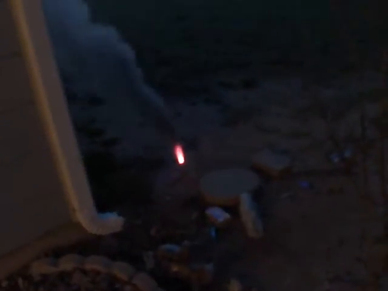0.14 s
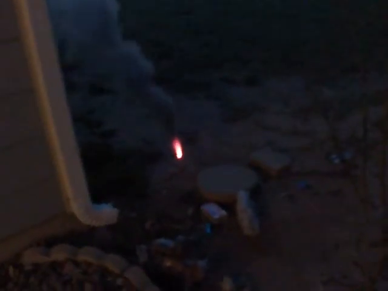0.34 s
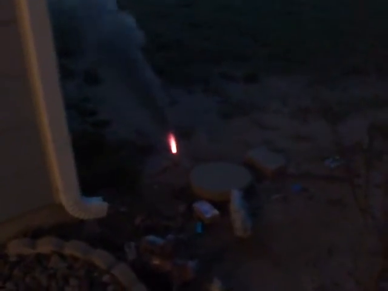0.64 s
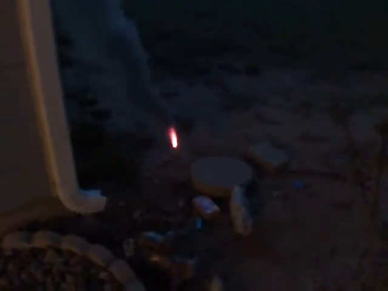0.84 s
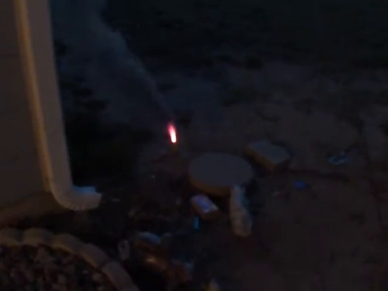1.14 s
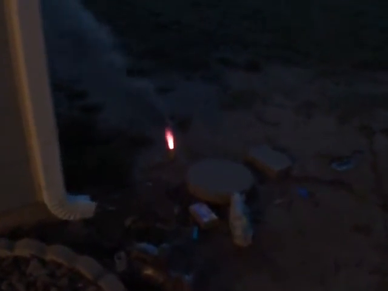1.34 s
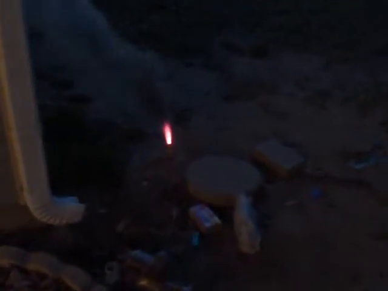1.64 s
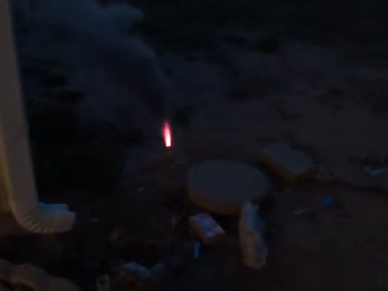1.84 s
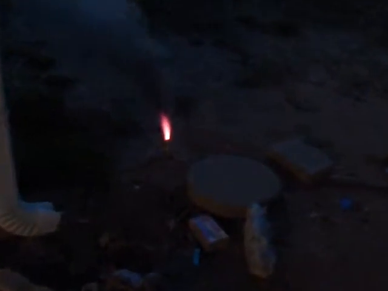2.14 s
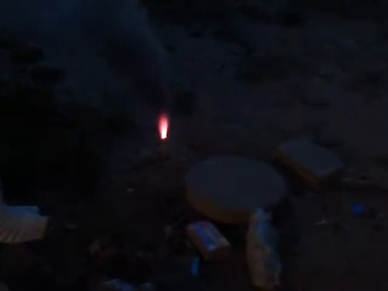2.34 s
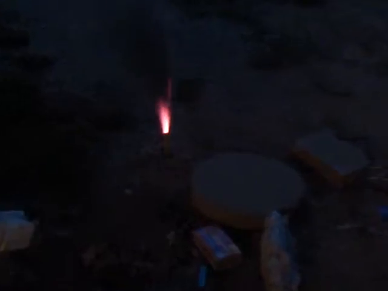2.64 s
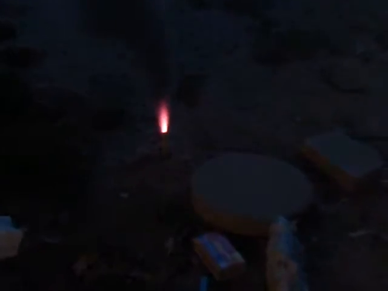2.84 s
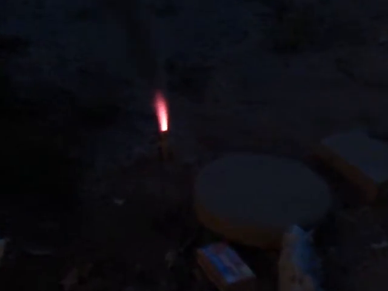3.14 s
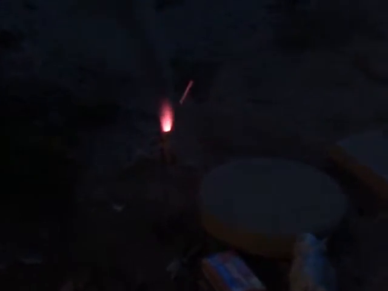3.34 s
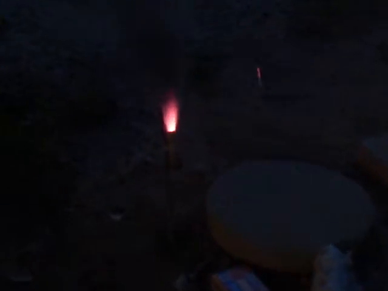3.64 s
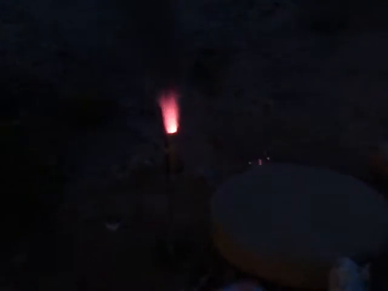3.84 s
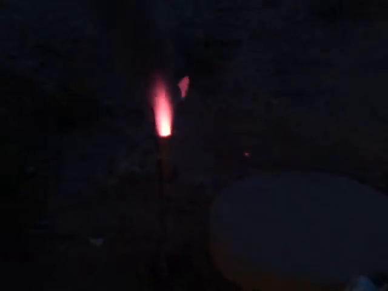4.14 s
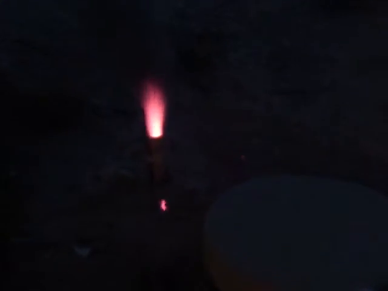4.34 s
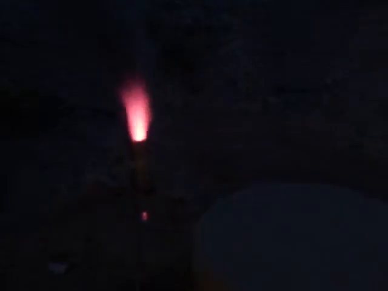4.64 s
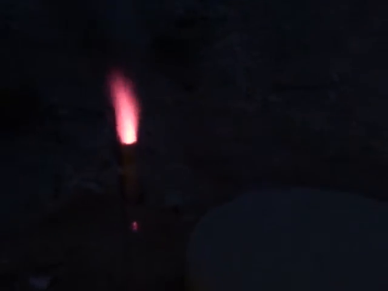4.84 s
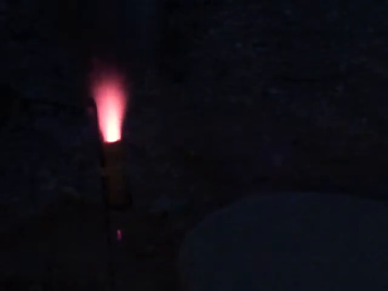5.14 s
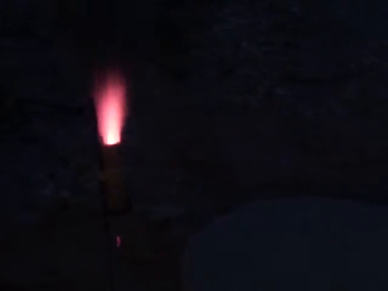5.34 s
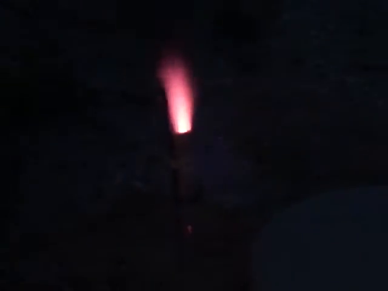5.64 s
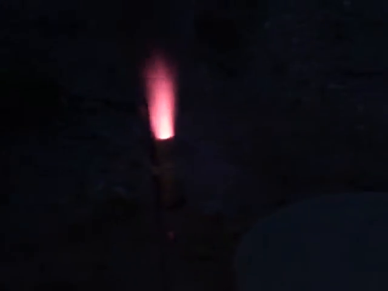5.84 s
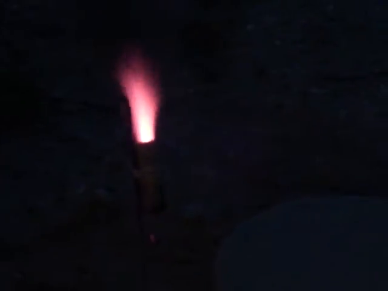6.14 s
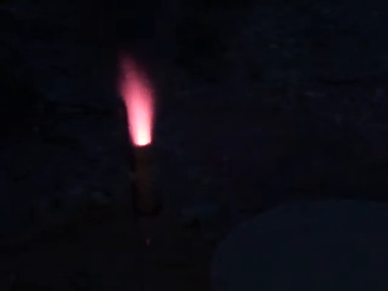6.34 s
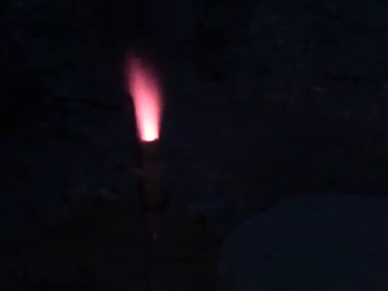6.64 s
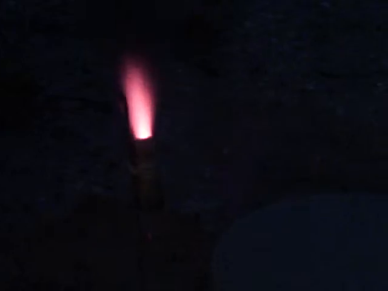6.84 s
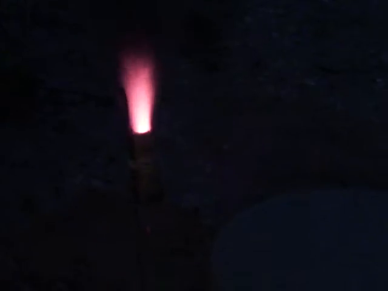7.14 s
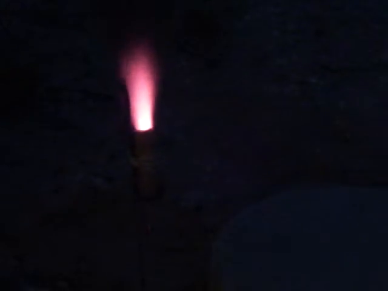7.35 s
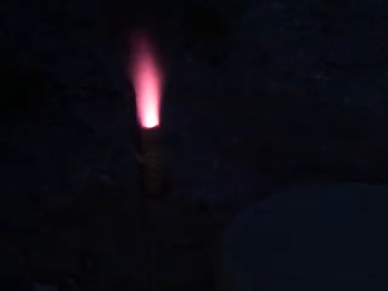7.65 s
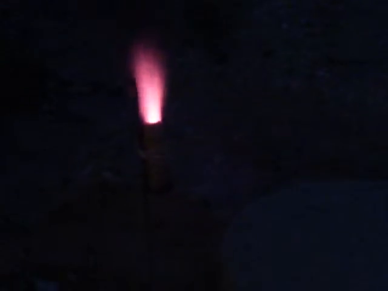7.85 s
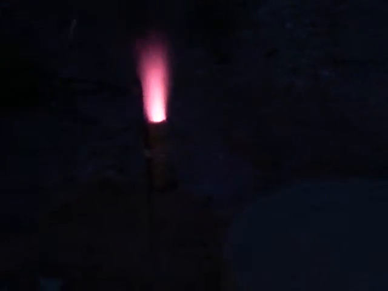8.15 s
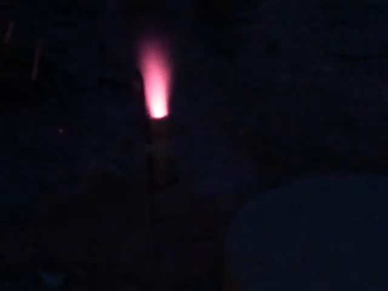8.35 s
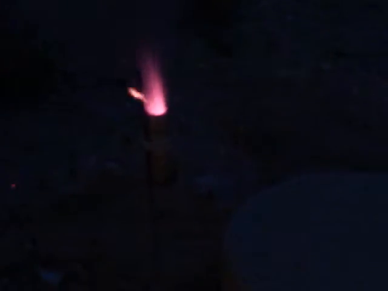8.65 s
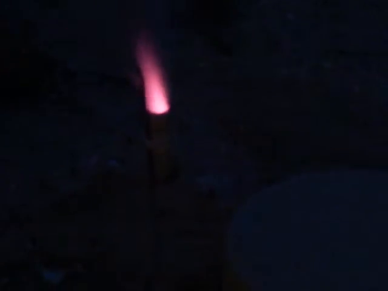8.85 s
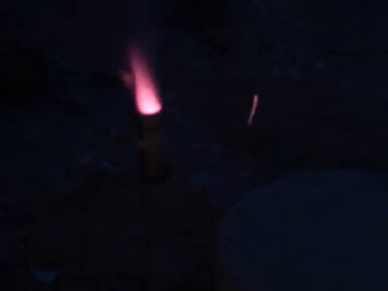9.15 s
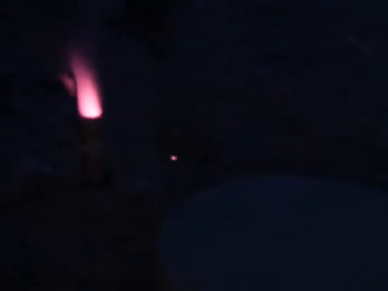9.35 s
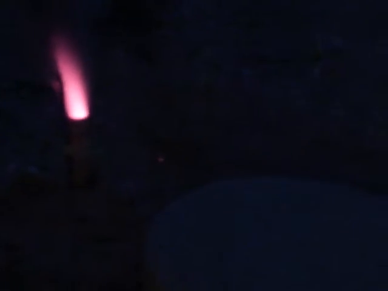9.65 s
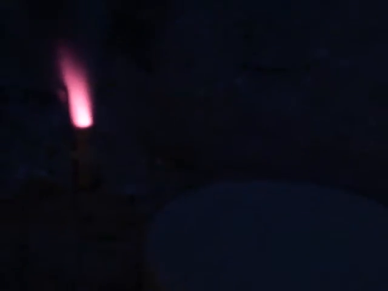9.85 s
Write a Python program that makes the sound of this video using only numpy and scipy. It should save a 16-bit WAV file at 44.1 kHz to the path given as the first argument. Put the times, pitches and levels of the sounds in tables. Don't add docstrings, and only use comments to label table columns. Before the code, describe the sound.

Continuous harsh jet of burning gas in a yard, its breathy whistle-like resonance gliding down over ten seconds with small surges and sags.

```python
import sys
import numpy as np
from scipy import signal
from scipy.fft import rfft, irfft, next_fast_len
from scipy.io import wavfile
from scipy.ndimage import uniform_filter1d, map_coordinates

SR = 44100
rng = np.random.default_rng(int(sys.argv[2]) if len(sys.argv) > 2 else 0)


def field_ratio(decibels):
    return 10 ** (np.asarray(decibels, dtype=float) / 20)


def waveform_to_disk(signal):
    frames = np.transpose(np.atleast_2d(signal))
    scaled = np.clip(frames, -1, 1) * 32767
    samples = np.round(scaled).astype(np.int16)
    wavfile.write(sys.argv[1], SR, samples)


N = 441000
TOP_HZ = 10960
FRAME = 512
STUB_FROM_MM = 29.2

# time [s], empty tube above the fuel [mm], flare of the flame outside the mouth [dB].
BURN = [(0, 14.3, -0.5), (1, 16.9, 0), (2, 17.45, 0), (4, 20.6, 0), (5.6, 22.7, -0.5), (6.4, 24.2, 0),
        (7.05, 24.9, 0.5), (8.15, 26.3, 0), (8.3, 26.6, 3), (8.95, 28.1, 7.5), (9.35, 29.7, 7.5),
        (9.6, 31.2, 6), (10, 32.5, 4.5)]


def along(points, hz):
    f, v = np.transpose(points)
    return np.interp(np.log(hz + 1), np.log(f + 1), v)


def curves(rows, t):
    s, *cols = np.transpose(rows)
    return [np.interp(t, s, c) for c in cols]


def wobble(rate):
    knots = rng.standard_normal(int(N * rate / SR) + 4)
    return map_coordinates(knots, [np.arange(N) * rate / SR])


def filtered(x, response):
    m = next_fast_len(N + SR // 2)
    spectrum = rfft(x, m) * response(np.fft.rfftfreq(m, 1 / SR))
    return irfft(spectrum, m)[..., :N]


def turbulence(colour, patchy_db):
    hz, t, z = signal.stft(rng.standard_normal(N), SR, nperseg=FRAME)
    field = uniform_filter1d(rng.standard_normal(z.shape), size=8, axis=0)
    field = uniform_filter1d(field, size=8, axis=1)
    gain = colour(hz[:, None], t) * np.ones(z.shape)
    gain = gain / np.sqrt(np.mean(gain ** 2, axis=0))
    gain = gain * field_ratio(patchy_db * field / field.std())
    x = signal.istft(z * gain, SR, nperseg=FRAME)[1][:N]
    return x / x.std()


def tube_colour(hz, t):
    sound_m_s = 343
    depth_mm, flare_db = curves(BURN, t)
    low_hz = sound_m_s * 1000 / (4 * depth_mm)
    stub_mm = np.maximum(depth_mm - STUB_FROM_MM, 0)
    share = 0.44 * (20 / depth_mm) / (1 + 0.06 * stub_mm)
    third_db = -17.5 - 0.75 * np.maximum(depth_mm - 20, 0) + 1.35 * flare_db + 3 * stub_mm

    def mode(centre_hz, width_hz):
        return hz * width_hz / np.sqrt((centre_hz ** 2 - hz * hz) ** 2 + (hz * width_hz) ** 2 + 1)

    first = mode(low_hz, share * low_hz) ** 1.37
    third = field_ratio(third_db) * mode(2.9 * low_hz, 2.2 * share * low_hz)
    return np.hypot(first, third) * (hz < 1.03 * TOP_HZ)


def tube(t, swing_db, chuff_db):
    flare_db = curves(BURN, t)[1]
    level_db = -25.5 + 0.088 * flare_db + swing_db + 0.5 * chuff_db + 0.088 * wobble(30)
    return field_ratio(level_db) * turbulence(tube_colour, patchy_db=0.42)


def hiss(t, swing_db, chuff_db):
    # frequency [Hz], density [dB per Hz].
    hiss_rows = [(800, -34), (1500, -18.5), (2200, -8), (3000, -0.5), (4500, -3), (6500, -0.5),
                 (8500, -1.5), (11000, 0)]
    early_db, fade_s = 2, 2.7
    depth_mm, flare_db = curves(BURN, t)
    level_db = -30.5 + early_db * np.exp(-t / fade_s) + 0.44 * flare_db + 0.83 * swing_db
    level_db -= 0.3 * np.maximum(depth_mm - STUB_FROM_MM, 0)
    level_db += 0.45 * chuff_db + 0.23 * wobble(30)
    colour = lambda hz, t: field_ratio(along(hiss_rows, hz)) * (hz < 1.03 * TOP_HZ)
    return field_ratio(level_db) * turbulence(colour, patchy_db=0.4)


def roar(t, swing_db, chuff_db):
    # frequency [Hz], density [dB per Hz].
    roar_rows = [(300, -42), (500, -7), (700, -3), (1000, -2), (1500, -3), (2500, 0), (5000, -18)]
    flare_db = curves(BURN, t)[1]
    level_db = -42 + flare_db + 0.42 * swing_db + 0.87 * wobble(7) + 0.14 * chuff_db
    return field_ratio(level_db) * turbulence(lambda hz, t: field_ratio(along(roar_rows, hz)), patchy_db=0.9)


def rumble(t):
    # frequency [Hz], density [dB per Hz].
    rumble_rows = [(20, -8), (200, 0), (400, 1), (700, -3), (1500, -35)]
    breeze_s, breeze_long_s, breeze_db = 5.8, 2.2, 2
    flare_db = curves(BURN, t)[1]
    level_db = -56 + 0.81 * flare_db + 1.3 * wobble(2.5)
    level_db += breeze_db * np.exp(-((t - breeze_s) / breeze_long_s) ** 4)
    return field_ratio(level_db) * turbulence(lambda hz, t: field_ratio(along(rumble_rows, hz)), patchy_db=0.6)


def pressure(t):
    # blow-out time [s], build-up [dB], sag [dB].
    chuffs = [(0.92, 0.7, 0.3), (1.5, -0.5, 2.5), (3.0, -0.5, .8), (3.62, 0.4, -1), (4.0, 0, 2),
              (4.8, 0.2, 1.8), (4.99, -0.7, 2.5), (5.31, 2, 3), (5.47, 1, -2), (6.3, 1, 2.5),
              (6.85, 0.5, 0.5), (7.1, 2, 0.3), (7.52, 1, 0), (7.75, 0.5, 0.5), (5.72, 0.5, -0.5),
              (6.55, 1, .3), (1.78, .8, -1), (7.98, .2, 2.3), (8.4, 1, 0), (9.07, 2.5, 1.5),
              (9.6, -0.5, 0.5)]
    build_s, blow_s, recover_s = 0.31, 0.033, 0.071
    s, build_db, sag_db = np.transpose(chuffs)[:, :, None]
    coarse_s = t[::FRAME // 4]
    since_s = coarse_s - s
    blown = 0.5 + 0.5 * np.tanh(since_s / blow_s)
    swing_db = build_db * (1 - blown) * np.exp(-abs(since_s) / build_s)
    swing_db -= sag_db * blown * np.exp(-abs(since_s) / recover_s)
    return np.interp(t, coarse_s, swing_db.sum(axis=0))


def spits(t):
    # time [s], length [s], start pitch [Hz], end pitch [Hz], level [dB].
    lumps = [
        (5.247, .014, 1200, 1850, -42),
    ]
    out = np.zeros(N)
    for s, length_s, from_hz, to_hz, db in lumps:
        since_s = t - s
        cycles = (from_hz + to_hz) / 2 * since_s + (to_hz - from_hz) / (4 * length_s) * since_s ** 2
        envelope = field_ratio(db + 7 * wobble(300)) * np.exp(-(since_s / length_s) ** 2)
        out += envelope * np.sin(2 * np.pi * cycles)
    return out


def motor():
    t = np.arange(N) / SR
    swing_db = pressure(t)
    chuff_db = 0.04 * wobble(14) + 0.15 * wobble(50)
    flame = hiss(t, swing_db, chuff_db) + roar(t, swing_db, chuff_db) + rumble(t)
    return tube(t, swing_db, chuff_db) + flame + spits(t)


def echoes(x, near, far, near_db, far_db):
    def copies(hz, table):
        return sum(g * np.exp(-2j * np.pi * hz * ms / 1000) for ms, g in table)

    def response(hz):
        dull = 1 / (1 + 1j * hz / 3000)
        return 1 + field_ratio(near_db) * copies(hz, near) + field_ratio(far_db) * dull * copies(hz, far)

    return filtered(x, response)


def yard(x, count):
    # frequency [Hz], t60 [s].
    decay = [(200, 0.12), (2000, 0.13), (10000, 0.025)]
    out, place = np.zeros(N), np.linspace(0, count - 1, N)
    for k in range(count):
        hz, t, z = signal.stft(rng.standard_normal(SR // 5), SR, nperseg=256)
        fade = field_ratio(-60 * t / along(decay, hz)[:, None])
        tail = signal.istft(z * fade, SR, nperseg=256)[1]
        part = x * np.sqrt(np.clip(1 - abs(place - k), 0, 1))
        delayed = np.pad(part, (600, 0))
        out += signal.oaconvolve(delayed, tail / np.linalg.norm(tail))[:N]
    return out


def scene():
    # delay [ms], gain.
    first_near = [(0.5, 0.016), (0.77, 0.079), (0.885, 0.13), (0.95, 0.09), (1.1, 0.16), (1.52, 0.0076),
                  (1.795, -0.12), (2.11, 0.099), (2.27, 0.048), (2.395, -0.12), (2.495, -0.049)]
    first_far = [(5.7, 0.043), (6.13, 0.029), (7.19, 0.089), (8.53, 0.022), (9.58, -0.043), (9.87, 0.073),
                 (9.85, -0.04), (12.44, -0.046), (4.7, 0.015), (20, .03)]
    second_near = [(0.482, -0.077), (0.678, -0.098), (0.897, 0.074), (0.98, 0.062), (1.155, 0.19),
                   (1.21, 0.062), (1.34, -0.072), (1.555, -0.07), (1.635, -0.06), (1.81, -0.085),
                   (1.945, 0.052), (2.245, 0.037), (2.58, -0.07), (2.935, 0.095), (3.0, -0.024),
                   (1.87, -0.036), (2.5, -0.05), (1.49, -0.042)]
    second_far = [(3.465, -0.039), (4.42, -0.012), (4.725, 0.0068), (6.07, 0.13), (6.345, 0.11),
                  (7.405, 0.12), (7.975, 0.072), (8.775, 0.078), (8.995, 0.059), (9.33, 0.019),
                  (12.37, 0.053), (22.42, 0.084), (23.81, 0.066)]
    # time [s], share of the second hold [0-1].
    settle = [(.9, 0.28), (1.45, 0.9)]
    jet = motor()
    share = np.clip(curves(settle, np.arange(N) / SR)[0], 0, 1)
    before = echoes(jet, first_near, first_far, near_db=2.0, far_db=10.5)
    after = echoes(jet, second_near, second_far, near_db=1.04, far_db=3.0)
    mix = (1 - share) * before + share * after + field_ratio(-19.0) * yard(jet, count=5)
    return mix[None]


def roll_off(x):
    return signal.sosfilt(signal.butter(12, 13600, fs=SR, output="sos"), x)


def record(dry):
    # centre [Hz], width [Hz], gain (minus = notch).
    cavities = [(686, 120, -0.13), (2230, 200, -0.12), (3570, 260, 0.076), (3820, 130, -0.22),
                (4050, 130, 0.17), (6400, 330, -0.011), (9400, 1300, 0.094)]
    # frequency [Hz], gain [dB].
    mic = [(10, -19), (50, -14), (85, -7.5), (125, -9), (160, -3), (220, 0.5), (10500, 0), (10950, -0.5)]
    image_band = [(12900, -100), (12980, -27), (13250, -30), (13500, -37), (13600, -100)]

    def response(hz):
        body = 1 + sum(g * 1j * hz * w / (c * c - hz * hz + 1j * hz * w) for c, w, g in cavities)
        return body * field_ratio(along(mic, hz)) / (1 + (hz / TOP_HZ) ** 900)

    kept = filtered(dry, response)
    mirror = kept * np.cos(np.pi * np.arange(N))
    image = filtered(mirror, lambda hz: field_ratio(along(image_band, hz)))
    return roll_off(kept + image)


dry = scene()
out = record(dry)
waveform_to_disk(out)
```